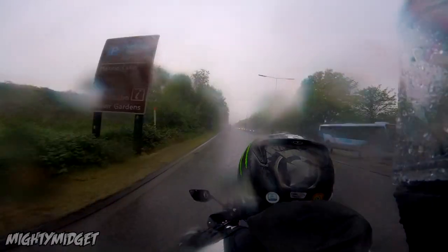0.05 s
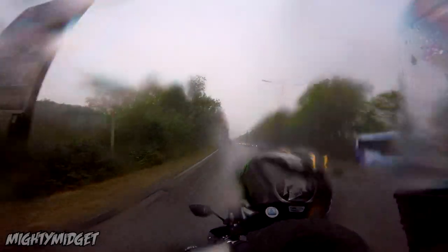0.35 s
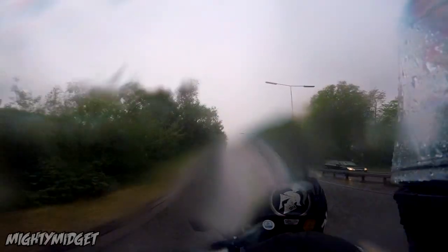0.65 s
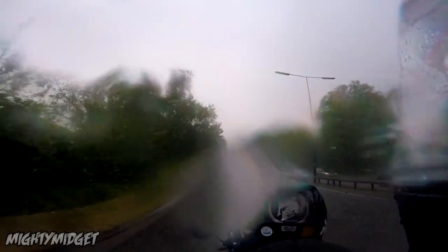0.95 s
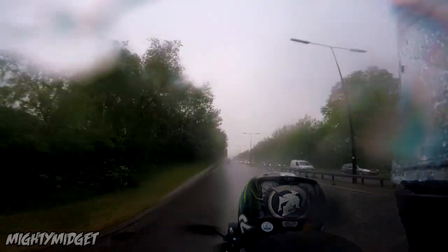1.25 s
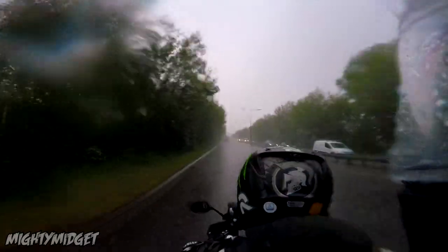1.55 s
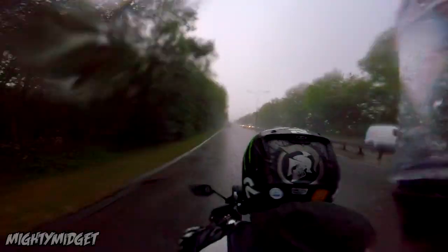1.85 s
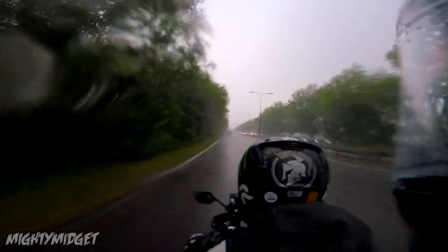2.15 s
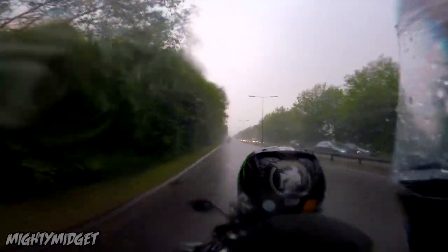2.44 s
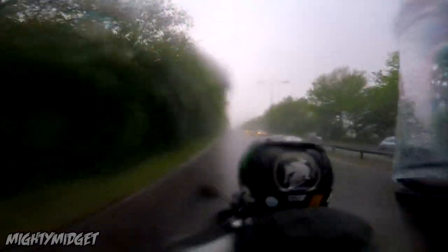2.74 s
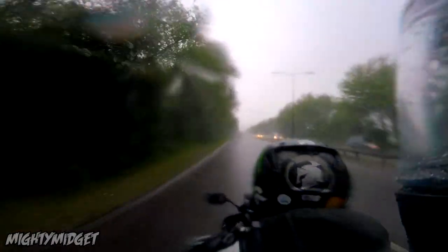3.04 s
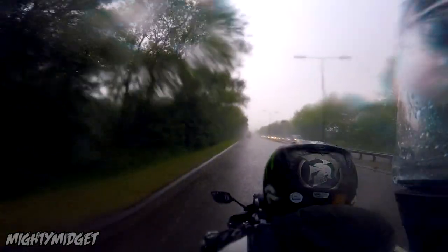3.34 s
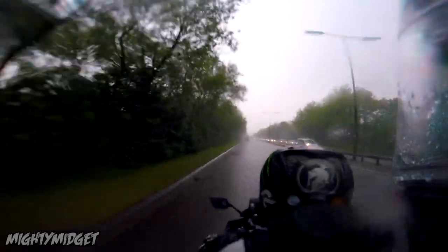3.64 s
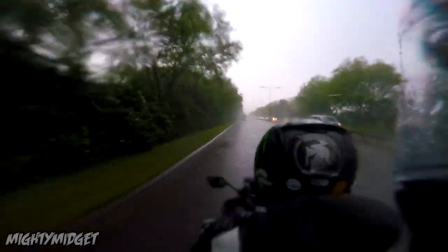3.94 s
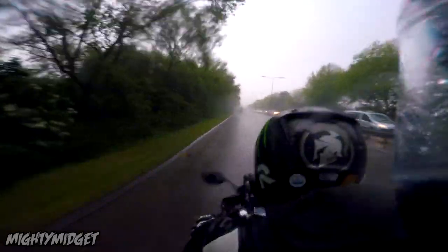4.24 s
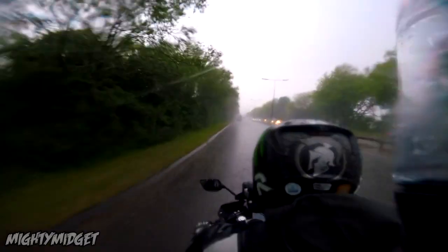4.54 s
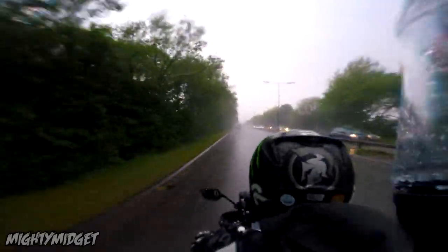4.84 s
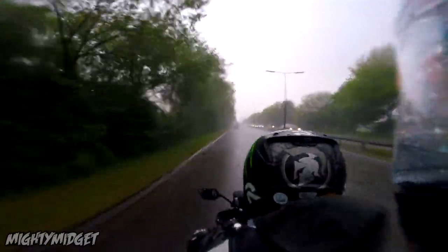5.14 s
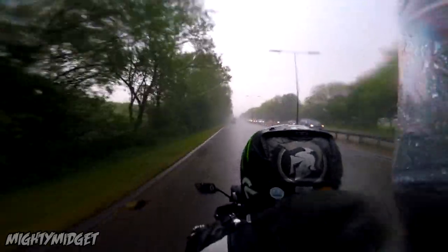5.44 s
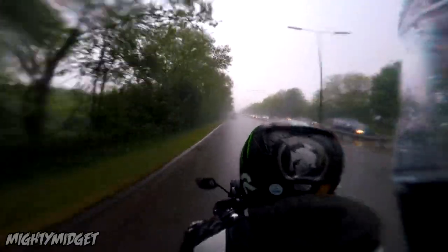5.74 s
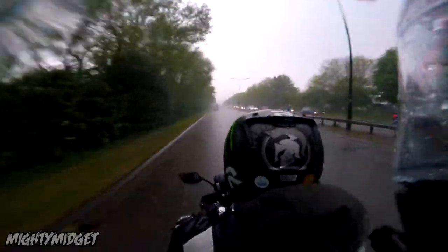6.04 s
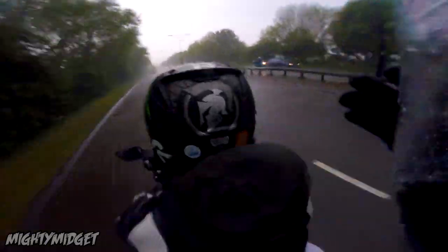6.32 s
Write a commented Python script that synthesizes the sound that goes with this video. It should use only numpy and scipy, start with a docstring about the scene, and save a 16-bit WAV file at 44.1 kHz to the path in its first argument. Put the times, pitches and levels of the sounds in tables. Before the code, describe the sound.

Riding a motorcycle through heavy rain: the engine rises, then cruises, while wind rumbles and drops tap on the microphone's housing.

```python
"""A twin-cylinder motorcycle pulls on a wide throttle in heavy rain, exhaust beats ringing its pipe.
From the start wind buffets a plastic housing riding along, spray hisses, small drops tick on the
shell, and heavy drops and hail knock on it. Wind and rain grow with speed. Around 3.6 s the throttle
eases; at 4.4 s a gust whistles over an edge; at 4.7 s the hardest knock lands. The motorcycle
cruises on a light throttle to the end while the shower slowly thickens."""
import sys
import numpy as np
from scipy import signal
from scipy.fft import rfft, irfft
from scipy.io import wavfile

SR = 44100
rng = np.random.default_rng(int(sys.argv[2]) if len(sys.argv) > 2 else 0)


def materialize(psi):
    """Save the field psi as 16-bit PCM at rate SR to the path in sys.argv[1].

    A 1-D psi becomes a single channel; in a 2-D psi each row is a channel.
    """
    bounded = np.clip(np.atleast_2d(psi).T, -1, 1)
    quanta = np.round(bounded * 32767).astype(np.int16)
    wavfile.write(sys.argv[1], SR, quanta)


N = 281358
TIME = np.arange(N) / SR


def from_db(db):
    """Decibels to gain."""
    return 10 ** (np.asarray(db) / 20)


def rms_one(x):
    """Scale to rms 1."""
    return x / np.sqrt(np.mean(x ** 2) + 1e-20)


def at_hz(curve, hz):
    """Interpolate a curve over log frequency."""
    curve_hz, values = np.transpose(curve)
    return np.interp(np.log(hz), np.log(curve_hz), values)


def butter(x, order, edges_hz, kind="band"):
    """Butterworth filter."""
    return signal.sosfilt(signal.butter(order, edges_hz, kind, fs=SR, output="sos"), x)


def drift(rate_hz):
    """Smooth random wander, rms about 1."""
    r = np.exp(-80 * np.pi * rate_hz / SR)
    slow = signal.lfilter([1], [1, -2 * r, r * r], rng.standard_normal(N // 40 + 2002))[2000:]
    return np.interp(np.arange(N) / 40, np.arange(len(slow)), rms_one(slow))


def ring(clicks, hz, t60_s):
    """One mode: a unit click starts a decaying unit sine."""
    r = np.exp(-np.log(1000) / (t60_s * SR))
    w = 2 * np.pi * min(hz, SR / 2) / SR
    return signal.lfilter([0, np.sin(w)], [1, -2 * r * np.cos(w), r * r], clicks + 1e-18)


# Wind and spray between the ears: f/Hz, left-right correlation
CORRELATION = [(30, 0.98), (500, 0.95), (1000, 0.047), (2000, 0.21), (4000, -0.33), (14000, 0.012)]

def banded_noise(spectrum, flicker_db, flicker_hz):
    """Stereo noise in flickering half-octave bands, rms 1."""
    edges_hz = 15 * 2 ** np.arange(0, 10.6, .5)
    common = drift(flicker_hz / 2)
    white = rng.standard_normal((2, 2, N))
    out = 0
    for k, (low, high) in enumerate(zip(edges_hz, edges_hz[1:])):
        hz = np.sqrt(low * high)
        flicker = drift(flicker_hz)
        if spectrum[0][0] < high and low < spectrum[-1][0]:
            mid, side = butter(white[k % 2], 2, [low, high])
            alike = at_hz(CORRELATION, hz)
            gain = from_db(at_hz(spectrum, hz) + flicker_db * (common + flicker))
            out += gain * (np.sqrt(1 + alike) * mid + np.sqrt(1 - alike) * side * [[1], [-1]])
    return rms_one(out)


# Spray spectral density: f/Hz, relative level/dB
SPRAY_SPECTRUM = [(700, 4.5), (1100, -2), (1900, 4), (2600, 3), (4000, -0.5), (5400, -2.5), (6500, -3),
                  (8200, -0.5), (11000, -7.5), (14500, -16), (16000, -11.5)]

def spray(speed_doublings, shower_db, cruise_db=-37.5, db_per_doubling=11.5):
    """Spray from tyres and air hisses, louder with speed and harder rain."""
    level_db = cruise_db + db_per_doubling * speed_doublings + shower_db
    return from_db(level_db) * banded_noise(SPRAY_SPECTRUM, flicker_db=1.92, flicker_hz=45)


# Buffeting spectral density: f/Hz, relative level/dB
WIND_SPECTRUM = [(18, 0.5), (35, 2.5), (60, -4.5), (90, -9), (160, -10.5), (260, -16.5), (400, -16),
                 (560, -18), (750, -31.5), (1000, -32.5), (2000, -44.5)]

def wind(speed_doublings, cruise_db=-20.5, db_per_doubling=4, swell_db=3, swell_mid_s=3.4, swell_s=1.9):
    """Air buffets the housing, swelling to full level near top speed."""
    calm = np.clip(.5 - (TIME - swell_mid_s) / swell_s, 0, 1)
    level_db = cruise_db + db_per_doubling * speed_doublings - swell_db * calm
    return from_db(level_db) * banded_noise(WIND_SPECTRUM, flicker_db=0.5, flicker_hz=9.1)


def whistle(at_s=4.395, half_width_s=0.11, low_hz=892, top_hz=1143, peak_db=-40.5, waver=0.011):
    """One gust sings over an edge, higher and louder the harder it blows."""
    gust = np.exp(-((TIME - at_s) / half_width_s) ** 2)
    hz = (low_hz + (top_hz - low_hz) * gust) * (1 + waver * drift(70.3))
    return from_db(peak_db) * np.sqrt(gust) * np.sin(2 * np.pi * np.cumsum(hz) / SR)


# Flurries of harder rain: t/s, half-width/s, boost/dB
RAIN_FLURRIES = [(0.15, 0.34, 2), (3.25, 0.62, 1), (5.7, 0.074, 2.5), (6.22, 0.18, 1.5)]

def shower_level_db(thicken_db_per_s=0.57):
    """The shower thickens slowly, with brief flurries."""
    flurry_db = sum(db * np.exp(-((TIME - s) / width_s) ** 2) for s, width_s, db in RAIN_FLURRIES)
    return thicken_db_per_s * (TIME - TIME.mean()) + flurry_db


def drops(per_s, spread_db, cap):
    """Impacts at random times, many small and a few large; height at most 1."""
    sizes = from_db(spread_db * (np.minimum(rng.exponential(1, N), cap) - cap))
    return sizes * rng.choice([-1, 1], N) * (rng.random(N) < per_s / SR)


def splash(clicks, t60_s):
    """Each drop spreads in a brief noisy push, different at the housing's two sound ports."""
    r = np.exp(-2 * np.log(1000) / (t60_s * SR))
    energy = signal.lfilter([1 - r], [1, -2 * r, r * r], clicks ** 2 + 1e-18)
    return np.sqrt(np.abs(energy)) * rng.standard_normal((2, N))


def fizz(clicks, t60_s):
    """Droplets fly off: the bright part of a splash."""
    return butter(splash(clicks, t60_s), 1, [3000, 12000])


# Rings of fine drops: f/Hz, relative level/dB, left over right/dB
PATTER_MODES = [(2970, 2.5, 12.5), (3690, 8.5, -1.5), (4370, -11.5, 8), (5170, 13, 4), (5580, 7, 13.5),
                (7600, -9, 2), (8130, 11.5, -3), (10200, -6, -12), (12300, -2, -20)]

def patter(rain_db, gain_db=-38, t60_cycles=13, fizz_db=7):
    """Fine rain: each splat excites one of several short rings, so pitch varies by drop."""
    clicks = drops(per_s=400, spread_db=4.2, cap=3.2) * from_db(rain_db + gain_db)
    out = from_db(fizz_db) * fizz(clicks, t60_s=0.01)
    mode_hit = rng.integers(0, len(PATTER_MODES), N)
    for k, (hz, ring_db, pan_db) in enumerate(PATTER_MODES):
        push = splash(clicks * (mode_hit == k), t60_s=0.0029)
        gains = from_db([[ring_db + pan_db / 2], [ring_db - pan_db / 2]])
        out += gains * ring(push, hz, t60_cycles / hz)
    return out


# Sharpest small drops: t/s, relative level/dB, f/Hz, left over right/dB, splash drive/dB
SHARP_DROPS = [(0.3217, -26.5, 3330, 2.5, -13), (0.7738, -13.5, 3590, -6, -30),
               (0.8696, -14, 5190, 1.5, -29), (1.6546, -15, 5120, 4, -25), (2.2947, -19, 4190, 0.5, -22),
               (2.398, -18, 4270, 4, -13.5), (2.4626, -18, 3785, -10, -33), (2.8255, -21, 2500, 0, -13),
               (3.2243, -17, 3530, 2.0, -13.5), (3.423, -15, 4440, 4, -14.5), (3.899, -13, 4250, -4, -24),
               (4.8807, -12, 5550, 0.0, -21), (5.3762, -17.5, 9516, 1.0, -17), (5.464, -13, 7804, 1.0, -19),
               (5.608, -21, 5216, 0.0, -14), (5.6441, -12.5, 4050, -3, -16),
               (5.6944, -14.5, 3910, 0.0, -19), (5.8247, -8.5, 5170, 1.0, -26)]

def ticks(gain_db=-1, t60_cycles=14, fizz_db=17, port_lag_s=.00008, size=2048):
    """Small fast drops: a short high ring in a splash, reaching one port just before the other."""
    rings, clicks = np.zeros((2, N + size)), np.zeros(N)
    for s, level_db, hz, pan_db, splash_db in SHARP_DROPS:
        at, gain = round(s * SR), from_db(level_db + gain_db)
        delay_s = port_lag_s * np.abs(rng.standard_normal((2, 1)))
        age_s = np.maximum(np.arange(size) / SR - delay_s, 0)
        tone = np.sin(2 * np.pi * hz * age_s) * np.exp(-np.log(1000) * age_s * hz / t60_cycles)
        rings[:, at:at + size] += gain * tone * from_db([[pan_db / 2], [-pan_db / 2]])
        clicks[at] = gain * from_db(splash_db)
    return rings[:, :N] + from_db(fizz_db) * fizz(clicks, t60_s=0.01)


# Heaviest drops and hailstones: t/s, relative level/dB, favoured f/Hz
HEAVY_HITS = [(0.0164, -20, 1920), (0.5212, -26, 1890), (0.9278, -21, 1890), (1.0765, -27, 1540),
              (1.9167, -22, 1870), (2.4423, -25, 1900), (2.576, -18, 1540), (2.7496, -16.5, 1931),
              (2.8394, -22, 1908), (2.9741, -20.5, 1930), (3.2246, -21, 1500), (3.3179, -19.5, 1892),
              (3.6968, -18.5, 1800), (3.9649, -15.5, 1790), (4.1096, -20.5, 1920), (4.136, -18, 1837),
              (4.7243, -18, 1931), (4.7426, -7.5, 1680), (4.747, -20, 1840), (5.1811, -18, 1881),
              (5.2193, -20.5, 1880), (5.3188, -15.5, 1880), (5.682, -17, 2121), (6.136, -21, 1811)]
# Plastic shell modes: f/Hz, relative level/dB, t60/s
SHELL_MODES = [(820, -13, 0.0084), (1300, -32, .009), (1575, 3.5, 0.02), (1903, 5.5, 0.023),
               (2090, -3, 0.022), (2665, 0, 0.015), (3660, -6.5, 0.021)]

def knocks(rain_db, hail_db=-7, drops_db=-30, fizz_db=-13, thud_db=3,
           detune=0.048, favour_db=6, favour_width_hz=160):
    """Heavy drops and hail ring the shell; the landing spot sets pitch and each mode's stereo balance."""
    clicks = drops(per_s=150, spread_db=6.5, cap=2.96) * from_db(rain_db + drops_db)
    favoured_hz = rng.uniform(1300, 2310, N)
    for s, level_db, hz in HEAVY_HITS:
        clicks[round(s * SR)] = from_db(level_db + hail_db)
        favoured_hz[round(s * SR)] = hz
    shell = from_db(fizz_db) * fizz(clicks, t60_s=0.014)
    spots = rng.integers(0, 3, N)
    for spot, tuning in enumerate([1 - detune, 1, 1 + detune]):
        at = np.flatnonzero(clicks * (spots == spot))
        for hz, mode_db, t60_s in SHELL_MODES:
            place_rad = rng.uniform(0, 2 * np.pi, N)[at]
            boost = from_db(favour_db * np.exp(-((hz - favoured_hz[at]) / favour_width_hz) ** 2))
            mid = 0.71 * from_db(1.2 * np.sin(2 * place_rad))
            # long waves reach both ports alike
            side = 0.34 * min(hz / 1900, 1) ** 2 * np.cos(place_rad) * [[1], [-1]]
            blows = np.zeros((2, N))
            blows[:, at] = clicks[at] * boost * (mid + side)
            shell += from_db(mode_db) * ring(blows, hz * tuning, t60_s)
    # squared: only the heaviest stones shake the housing on its mount
    thud = from_db(thud_db) * ring(clicks ** 2, hz=740, t60_s=.016)
    return butter(shell, 1, 700, "high") + thud


# Pipe and silencer resonances: f/Hz, gain/dB
PIPE_RESPONSE = [(35, -28), (105, -12), (150, -6), (230, -11.5), (270, -24), (350, -23), (480, -19.5),
                 (535, -24), (580, -13), (650, -15), (720, -19), (820, -20.5), (880, -30.5), (1100, -36.5)]

def pipe(hz, size=8192):
    """Gain and phase/rad at hz; minimum phase, as the pipe rings only after each beat."""
    grid_hz = np.arange(size // 2 + 1) * SR / size
    cepstrum = irfft(np.log(from_db(at_hz(PIPE_RESPONSE, grid_hz + 1))))
    phase_rad = rfft(2 * cepstrum[:size // 2], size).imag
    return from_db(at_hz(PIPE_RESPONSE, hz)), np.interp(hz, grid_hz, phase_rad)


# Exhaust harmonics before the pipe: multiple of cycle rate, pulling level/dB, cruising level/dB
EXHAUST_ORDERS = [(1, 12, 17.5), (2, -29, -2), (3, 5.5, -8.5), (4, 8, 6), (5, 6, 6.5), (6, -1.5, 7.5),
                  (7, 4.5, 0.5), (8, 13, 3), (9, 8.5, 9.5), (10, -3, -8), (11, 4, -1.5), (12, 7.5, 0.5),
                  (13, 5.5, 1), (14, -4, -18), (15, -9.5, -6.5), (16, 1, -17), (17, 1, -6.5),
                  (18, -6.5, -14), (19, -39, -27), (20, -2.5, -13), (21, -3.5, -11), (22, -6, -6)]

def engine(cycle_hz, speed_doublings, pull_db=-19.5, cruise_db=-20.5, db_per_doubling=4, rasp_db=-21):
    """Two close exhaust beats and a long pause per cycle, each beat with a puff of turbulent gas."""
    ease_mid_s, ease_s = 3.58, 0.86
    start_cycles, beat_gap_cycles, jitter_cycles = 0.2085, .23, 0.0005
    boom_top_order, bark_lead_cycles = 10.06, 0.1662  # higher orders bark ahead of the boom
    second_beat, ringing, uneven_db = 0.96, 0.92, .5
    throttle = np.clip(.5 - (TIME - ease_mid_s) / ease_s, 0, 1)
    level_db = throttle * pull_db + (1 - throttle) * cruise_db + db_per_doubling * speed_doublings
    cycles = start_cycles + np.cumsum(cycle_hz) / SR + jitter_cycles * drift(25)
    note = 0
    for order, open_db, eased_db in EXHAUST_ORDERS:
        strength = throttle * from_db(open_db) + (1 - throttle) * from_db(eased_db)
        pipe_gain, pipe_rad = pipe(order * cycle_hz)
        pair_rad = np.angle(1 + second_beat * np.exp(-2j * np.pi * order * beat_gap_cycles))
        bark_rad = 2 * np.pi * bark_lead_cycles * max(order - boom_top_order, 0)
        phase_rad = 2 * np.pi * order * cycles + pair_rad + ringing * pipe_rad + bark_rad
        note += np.sqrt(2) * strength * pipe_gain * np.cos(phase_rad)
    # gas rushes out while the valves are open
    valves = sum((.5 + .5 * np.cos(2 * np.pi * (cycles + bark_lead_cycles - beat))) ** 16
                 for beat in (0, beat_gap_cycles))
    gas = butter(rng.standard_normal(N), 4, [130, 700])
    rasp = from_db(rasp_db) * rms_one(gas * valves)
    return from_db(level_db + uneven_db * drift(21)) * (note + rasp)


# Engine speed: t/s, four-stroke cycle f/Hz
CYCLE_RATE = [(0.0, 34.96), (0.46, 35.79), (0.91, 36.98), (1.4, 38.61), (2.04, 41.37), (2.88, 45.08),
              (3.41, 47.36), (3.87, 48.01), (4.97, 47.46), (6.11, 46.6), (6.38, 46.2)]

def scene(cruise_hz=47.5, rain_db_per_doubling=9):
    """Engine and wind central, rain all around; in one gear, air and rain rise with engine speed."""
    cycle_hz = np.interp(TIME, *np.transpose(CYCLE_RATE))
    speed_doublings = np.log2(cycle_hz / cruise_hz)
    shower_db = shower_level_db()
    rain_db = rain_db_per_doubling * speed_doublings + shower_db
    air = wind(speed_doublings) + spray(speed_doublings, shower_db)
    rain = knocks(rain_db) + ticks() + patter(rain_db)
    return air + rain + engine(cycle_hz, speed_doublings) + whistle()


def record(dry, ceiling=0.72, cutoff_hz=15000):
    """Soft clip, then steep low-pass."""
    rounded = ceiling * np.tanh(dry / ceiling)
    return signal.sosfilt(signal.ellip(10, .2, 80, cutoff_hz, fs=SR, output="sos"), rounded)


dry = scene()
out = record(dry)
materialize(out)
```